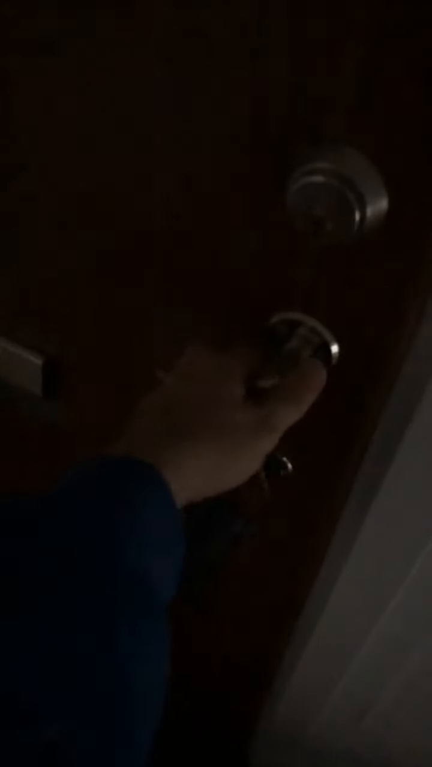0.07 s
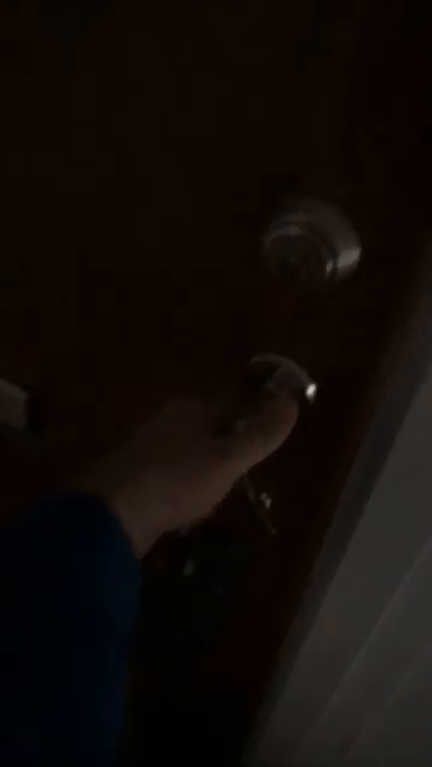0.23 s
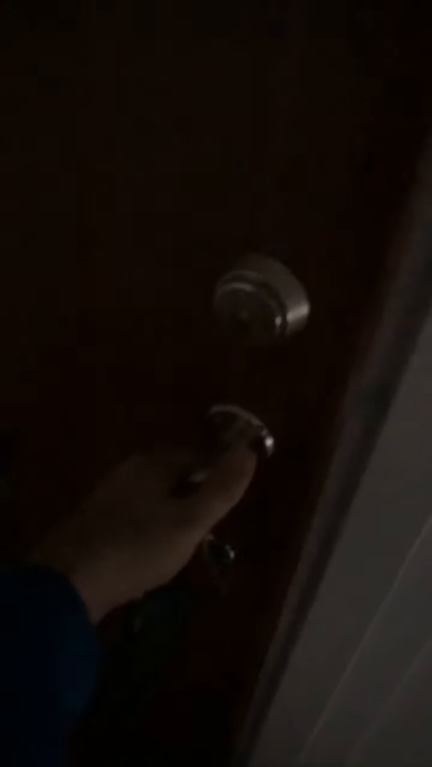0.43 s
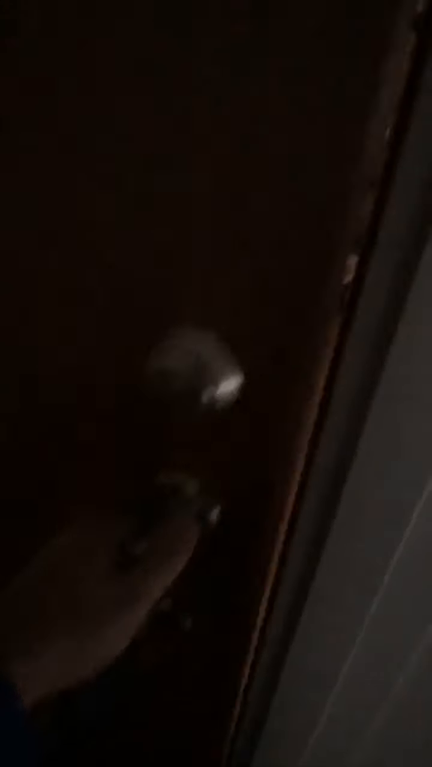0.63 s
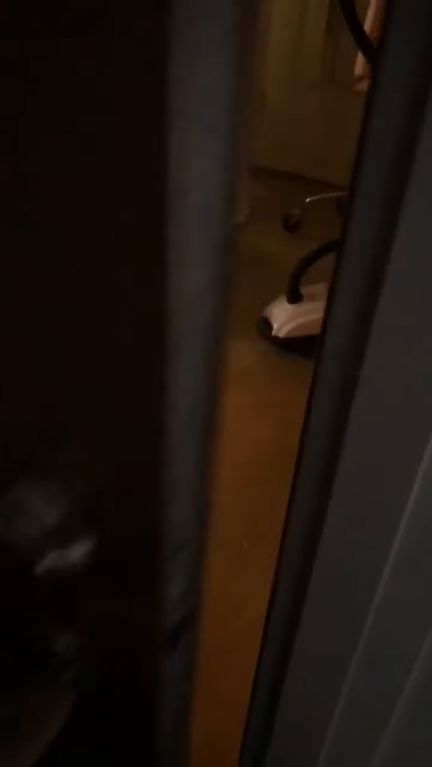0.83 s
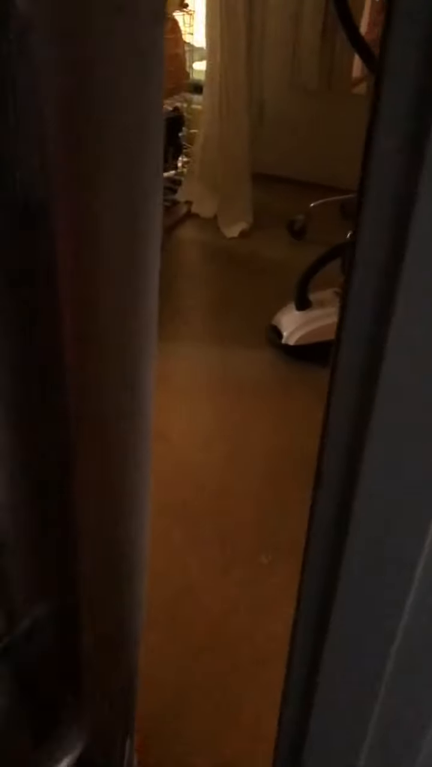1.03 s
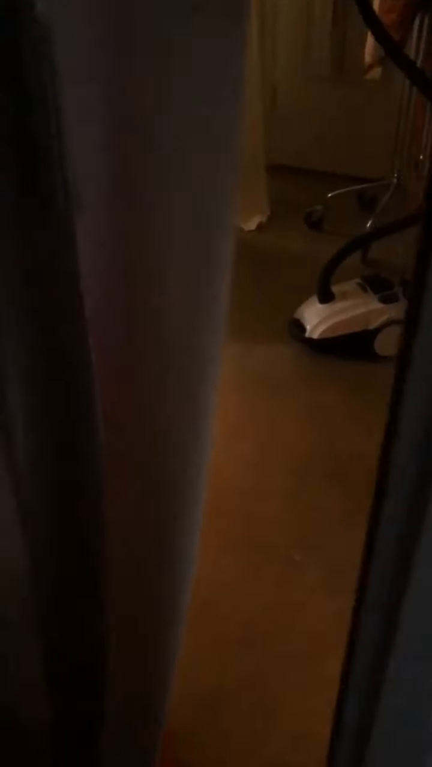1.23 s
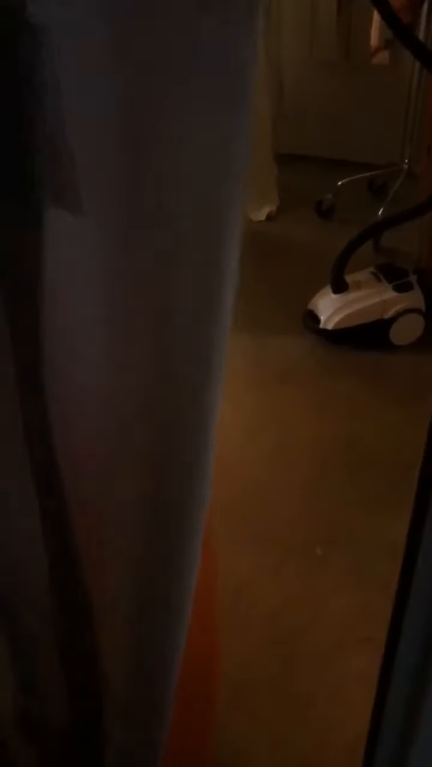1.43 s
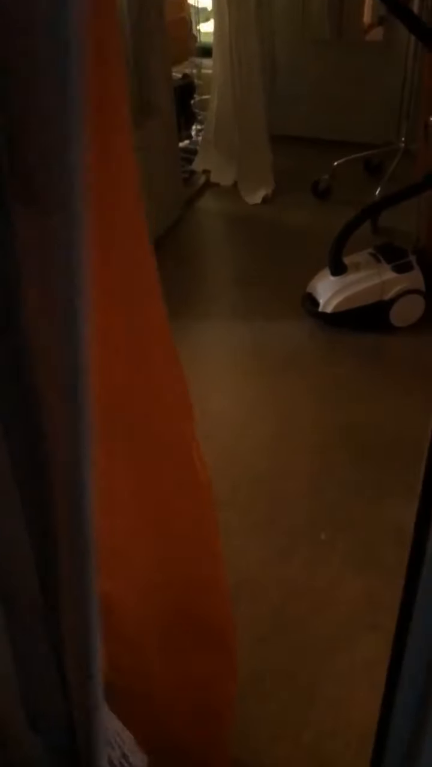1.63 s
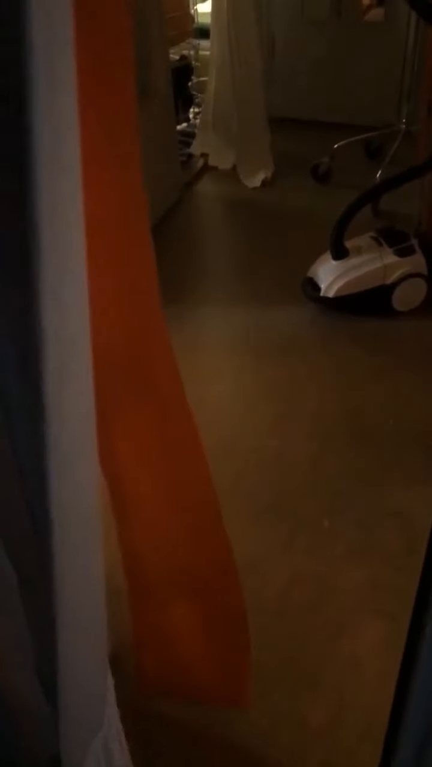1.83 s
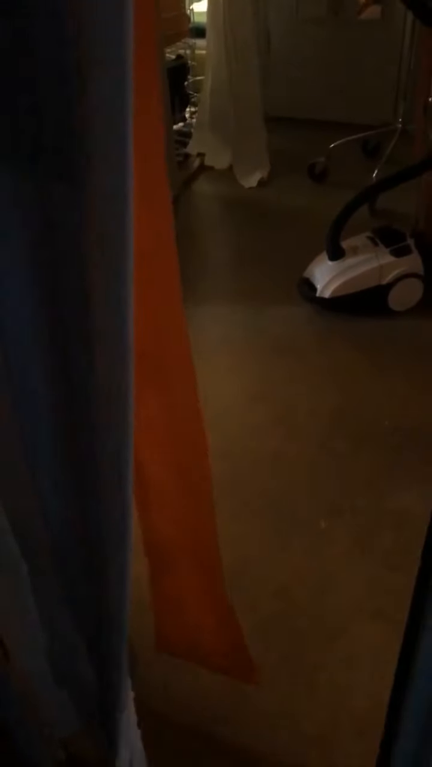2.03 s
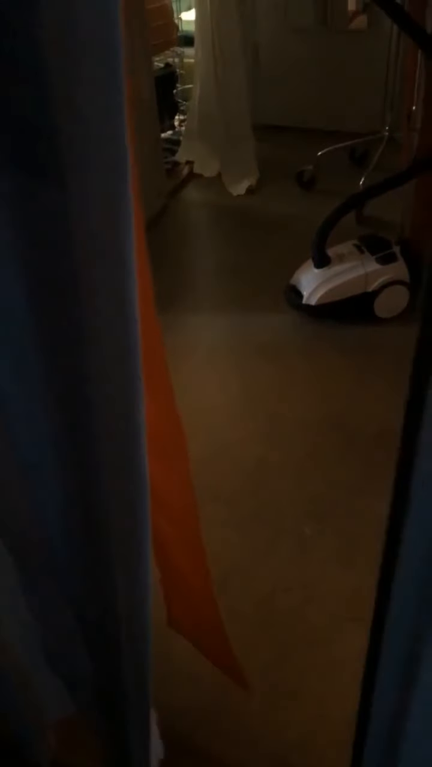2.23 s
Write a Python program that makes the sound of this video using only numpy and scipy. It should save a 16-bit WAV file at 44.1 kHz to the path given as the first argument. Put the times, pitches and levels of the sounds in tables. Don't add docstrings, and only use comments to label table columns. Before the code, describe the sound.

Close handheld pickup of a door latch: one loud snap with a reverberant tail, soft curtain brushing, a smaller knob click, a quiet tap, then faint chinks, rattles and rustle over dull room murmur.

```python
import sys
import numpy as np
from scipy import signal
from scipy.fft import rfft, irfft
from scipy.io import wavfile
from scipy.ndimage import uniform_filter1d

SR = 44100
rng = np.random.default_rng(int(sys.argv[2]) if len(sys.argv) > 2 else 0)


def volts_from_db(level):
    exponent = np.asarray(level, float) / 20
    return 10 ** exponent


def materialize(psi):
    bounded = np.clip(np.atleast_2d(psi).T, -1, 1)
    quanta = np.round(bounded * 32767).astype(np.int16)
    wavfile.write(sys.argv[1], SR, quanta)


N = 101033


def level(x, rms_db):
    return x * volts_from_db(rms_db) / np.sqrt(np.mean(x ** 2))


def colour(x, points):
    p = np.array(points, float)
    hz = np.arange(len(x) // 2 + 1) * SR / len(x) + 1
    gain_db = np.interp(np.log(hz), np.log(p[:, 0]), p[:, 1])
    return irfft(rfft(x) * volts_from_db(gain_db), len(x))


def noise(points):
    return level(colour(rng.standard_normal(N + 1), points)[:N], 0)


def curve(rows):
    return np.interp(np.arange(N) / SR, [r[0] for r in rows], [r[1] for r in rows])


def walk(rate_hz):
    hold = int(SR / rate_hz)
    steps = np.repeat(rng.standard_normal(N // hold + 1), hold)[:N]
    return uniform_filter1d(uniform_filter1d(steps, hold), hold)


def resonate(x, hz, width_hz):
    hz = min(hz, 0.45 * SR)
    return signal.lfilter(*signal.iirpeak(hz, hz / max(width_hz, 20), fs=SR), x)


def resonate_twice(x, hz, width_hz):
    return resonate(resonate(x, hz, width_hz), hz, width_hz)


def hits(rows, body, broad_db, wet_db, low_hz, top_hz, blow_db=-27.0):
    out = np.zeros((2, N + SR))
    t = np.arange(SR // 4) / SR
    band = signal.butter(2, [low_hz, top_hz], "bandpass", fs=SR, output="sos")
    for start_s, level_db, decay_s, pitch in rows:
        push = rng.standard_normal(len(t)) * volts_from_db(-60 * t / decay_s) * np.minimum(t / 0.0015, 1)
        push[8] += volts_from_db(blow_db) * np.sqrt(np.sum(push ** 2))
        crack = signal.sosfilt(band, push)
        ring = volts_from_db(broad_db) * crack
        for hz, width_hz, db in body:
            ring = ring + volts_from_db(db) * resonate_twice(push, hz * pitch, width_hz * pitch * 1.5)
        send = crack + 0.05 * ring
        send = volts_from_db(wet_db) * send * ring.std() / send.std()
        i = int(start_s * SR)
        out[:, i:i + len(t)] += np.array([ring, send]) * volts_from_db(level_db) / np.abs(ring).max()
    return out[:, :N]


# start_s, level_db, decay_s, pitch_factor
SCRAPES = [
    (.051, -20.5, 0.052, 0.93),
    (.062, -18.5, 0.034, 1.4),
    (.069, -25.5, 0.056, 1.05),
    (.086, -17, 0.26, 0.89),
]
# pitch_hz, width_hz, level_db
SCRAPE_BODY = [(1026, 500, -6), (3060, 380, -2), (4490, 500, -3), (6540, 700, -13), (7300, 1300, -8.5),
               (11700, 8000, -21)]


def bolt_scrapes():
    return hits(SCRAPES, SCRAPE_BODY, broad_db=-48, wet_db=1, low_hz=500, top_hz=10500)


# start_s, level_db, decay_s, pitch_factor
SNAPS = [
    (.0896, -5, .018, 1.0),
    (.0935, -11, .05, .97),
    (.098, -13, .08, .93),
]
# pitch_hz, width_hz, level_db
SNAP_BODY = [(286, 180, 13), (590, 480, 8.5), (1020, 270, 11.5), (1570, 440, 3.7), (2230, 1100, 2.5),
             (3520, 1300, 3.7), (4120, 760, 6.4), (5150, 660, 10.6), (11000, 530, 13), (14000, 3900, 6.1)]


def bolt_snaps():
    return hits(SNAPS, SNAP_BODY, broad_db=1, wet_db=0.42, low_hz=150, top_hz=8200, blow_db=-5.0)


# start_s, level_db, decay_s, pitch_factor
RETURNS = [
    (.9078, -21, .009, 1.0),
    (.9092, -15, .019, 1.0),
    (.9125, -22, .05, 1.0),
]
# pitch_hz, width_hz, level_db
RETURN_BODY = [(293, 78, -10), (1260, 180, 3), (1900, 230, 10), (3160, 230, 3), (4180, 980, -2.5),
               (5560, 330, -6), (6730, 310, 4), (8090, 230, 2), (12000, 1200, -9)]


def knob_returns():
    return hits(RETURNS, RETURN_BODY, broad_db=-7.5, wet_db=-2.1, low_hz=580, top_hz=7200, blow_db=-1.0)


# start_s, level_db, decay_s, pitch_factor
SETTLES = [
    (.9415, -37, .03, 1.35),
    (.947, -32, .03, .95),
    (.958, -39, .1, 1.0),
]
# pitch_hz, width_hz, level_db
SETTLE_BODY = [(1350, 110, 3), (1820, 440, 0), (2450, 200, -5), (3580, 240, -8)]


def knob_settles():
    return hits(SETTLES, SETTLE_BODY, broad_db=-30, wet_db=-3.5, low_hz=1320, top_hz=1900, blow_db=-5.0)


# start_s, level_db, decay_s, pitch_factor
TAPS = [
    (1.5038, -21, 0.0085, 0.98),
    (1.5052, -25.5, 0.0034, 0.98),
    (1.5075, -28, 0.29, 1.0),
]
# pitch_hz, width_hz, level_db
TAP_BODY = [(750, 220, -5), (1580, 470, 11), (2350, 1700, 0.5), (3400, 500, 4), (3950, 530, 5),
            (6300, 970, 5), (8750, 400, 1), (9600, 450, -2)]


def latch_taps():
    return hits(TAPS, TAP_BODY, broad_db=-5, wet_db=-0.6, low_hz=600, top_hz=9800, blow_db=-4.0)


# start_s, level_db, tick_db, tilt (steps of 3.9 dB per octave), ring_length_factor
CHINKS = [
    (1.506, -52, -70, 7, .7),
    (1.672, -58, -80, -3, .5),
    (1.870, -35, -46, 1, .9),
    (1.888, -41, -54, .5, 1.0),
    (1.905, -41, -55, 0, 1.2),
    (1.982, -46, -66, 0, .5),
    (2.000, -47, -32, 3, .3),
    (2.008, -46, -42, 0, .3),
    (2.028, -51, -52, 3, .4),
    (2.113, -34, -34, -4, 0.1),
]
# level_db, t60_s; then pitch_hz of each
KEYS = [(-13, .5), (-13, .08), (-14, .45), (-2, .1), (-12, .05), (-8, .06), (-18, .45), (-27, .1)]
KEY_HZ = [6720, 6790, 11740, 11800, 12200, 13600, 13660, 15320]


def keys():
    out = np.zeros(N + SR)
    t = np.arange(SR // 2) / SR
    ends_s = [row[0] for row in CHINKS[1:]] + [N / SR]
    for (start_s, level_db, tick_db, tilt_db, length), end_s in zip(CHINKS, ends_s):
        ring = 0
        for hz, (mode_db, t60_s), phase in zip(KEY_HZ, KEYS, rng.random(len(KEYS))):
            tilted_db = level_db + mode_db + tilt_db * np.log2(hz / 10200.0) * 3.9
            waver_db = 3 * walk(96)[:len(t)]
            decay_db = -60 * t / t60_s / length
            ring = ring + volts_from_db(tilted_db + decay_db + waver_db) * np.sin(2 * np.pi * (hz * t + phase))
        damping = volts_from_db(-900 * np.maximum(t + start_s - end_s, 0))
        tick = volts_from_db(tick_db - 60 * t / 0.034) * resonate(rng.standard_normal(len(t)), 16000, 7800)
        out[int(start_s * SR):][:len(t)] += ring * np.minimum(t / 0.0002, 1) * damping + tick
    return out[:N]


# level_db, t60_s
HOOK = (-48, .28)


def coat_hook():
    out = np.zeros(N + SR)
    t = np.arange(SR // 2) / SR
    level_db, t60_s = HOOK
    start_s, pitch_hz, rise_s = 1.512, 5286, 0.013
    ring = volts_from_db(level_db - 60 * t / t60_s) * np.sin(2 * np.pi * pitch_hz * t)
    out[int(start_s * SR):][:len(t)] += ring * np.minimum(t / rise_s, 1)
    return out[:N]


# start_s, level_db, decay_s, pitch_factor
CLACKS = [
    (1.904, -37, .06, 1.0),
    (1.913, -41, .06, 1.0),
]
# pitch_hz, width_hz, level_db
CLACK_BODY = [(1440, 120, 4), (2200, 100, -1), (2820, 50, 6.5), (3180, 90, 3), (4000, 330, -2),
              (4730, 160, -15)]


def hanger_clacks():
    return hits(CLACKS, CLACK_BODY, broad_db=-12, wet_db=0.46, low_hz=1400, top_hz=6200, blow_db=-3.5)


# start_s, level_db, decay_s, pitch_factor
RATTLES = [
    (2.043, -39, .08, 1.0),
    (2.057, -41, .08, 1.0),
    (2.071, -41, .08, 1.0),
    (2.085, -43, .15, 1.0),
]
# pitch_hz, width_hz, level_db
RATTLE_BODY = [(3410, 420, 1), (4400, 220, 10), (5230, 960, 0.5), (6500, 670, -10)]


def hanger_rattles():
    return hits(RATTLES, RATTLE_BODY, broad_db=-26, wet_db=0.5, low_hz=3400, top_hz=6600, blow_db=-6.0)


# start_s, level_db, decay_s, pitch_factor
KNOCKS = [
    (0.0, -42, 0.062, 0.43),
    (1.354, -35.5, 0.098, 1.0),
    (1.84, -46.5, 0.033, 0.29),
    (2.034, -39, 0.097, 0.7),
    (2.062, -40, .05, 0.99),
    (2.088, -46.5, 0.058, 0.63),
]
# pitch_hz, width_hz, level_db
KNOCK_BODY = [(876, 97, 3), (1150, 120, 2.5), (1900, 250, 3.5), (3700, 900, -5.5)]


def coat_knocks():
    return hits(KNOCKS, KNOCK_BODY, broad_db=-18, wet_db=0.91, low_hz=610, top_hz=2360, blow_db=-2.5)


# start_s, end_s, level_db
BRUSH = (0.69, 1.41, -53)
# pitch_hz, width_hz, level_db
BRUSH_BODY = [(2400, 520, -0.3), (5500, 1500, -0.24)]


def hinge_swish():
    start_s, end_s, level_db = BRUSH
    phase = np.clip((np.arange(N) / SR - start_s) / (end_s - start_s), 0, 1)
    swell = np.sin(np.pi * phase) ** 0.69
    friction = 0
    for hz, width_hz, db in BRUSH_BODY:
        friction = friction + volts_from_db(db) * resonate_twice(rng.standard_normal(N), hz, width_hz)
    return swell * level(friction, level_db)


# start_s, level_db
RUSTLE = [(.3, -63.5), (.45, -49), (.6, -50.5), (.9, -51.5), (1.05, -64), (1.33, -70), (1.4, -58),
          (1.47, -60), (1.5, -64), (1.7, -96), (1.86, -60), (1.99, -63), (2.02, -50), (2.12, -53.5),
          (2.2, -44.5), (2.27, -41)]
# pitch_hz, level_db
CLOTH_BRIGHT = [(1500, -8), (4000, -3.5), (6500, -2.5), (10300, -4), (13500, 0.5), (16000, -4)]


def cloth():
    return volts_from_db(curve(RUSTLE) + 2.8 * walk(39.86)) * noise(CLOTH_BRIGHT)


# start_s, level_db
DRAUGHT = [(0, -19), (.04, -28), (.14, -21.5), (.18, -36), (.32, -36), (.55, -38), (.9, -51.5),
           (1.27, -51.5), (1.33, -46), (1.5, -62), (1.56, -41.5), (1.69, -46), (1.79, -30), (1.9, -33),
           (1.98, -41), (2.08, -59), (2.2, -37), (2.29, -44.5)]
# pitch_hz, level_db
DRAUGHT_COLOUR = [(12, -18), (25, 4), (40, -1.5), (70, -4.5), (100, -21.5), (160, -17), (260, -65),
                  (400, -90)]


def draught():
    gust = noise(DRAUGHT_COLOUR)
    strength = np.sqrt(np.abs(uniform_filter1d(gust ** 2, size=3000)))
    return volts_from_db(curve(DRAUGHT)) * gust / (0.097 + strength)


# start_s (centre), pitch_hz, level_db, length_s
PUFFS = [(0.015, 69.3, -19, 0.031), (0.061, 44.7, -32, 0.023), (0.125, 77.4, -21.5, 0.043),
         (0.197, 61, -33, 0.028), (0.244, 86, -23.5, 0.021), (0.293, 76, -29, 0.026),
         (0.323, 50, -24.5, 0.023), (.408, 65, -25.5, 0.014), (0.539, 44.4, -32, .04)]


def puffs():
    t = np.arange(N) / SR
    out = np.zeros(N)
    for centre_s, pitch_hz, level_db, length_s in PUFFS:
        bell = np.exp(-0.5 * (3.34 * (t - centre_s) / length_s) ** 2)
        out += volts_from_db(level_db) * bell * np.sin(2 * np.pi * pitch_hz * (centre_s - t))
    return out


# pitch_hz, t60_s, level_db
HALL = [(150, 0.48, 7.5), (383, 1.56, -3.5), (1030, 0.93, 1), (1990, 0.74, 1), (4200, 0.99, -3.5),
        (6500, 0.27, -3.5), (11000, 0.31, -1.5), (16000, 0.26, 8)]


def hall(x):
    hall_db, rise_s = -15.5, 0.00057
    t = np.arange(N) / SR
    h = np.array(HALL, float)
    tail = 0
    for hz in 125 * 2 ** np.arange(0, 7.1, 0.5):
        t60_s = np.interp(np.log(hz), np.log(h[:, 0]), h[:, 1])
        db = np.interp(np.log(hz), np.log(h[:, 0]), h[:, 2])
        tail = tail + volts_from_db(db - 60 * t / t60_s) * resonate_twice(rng.standard_normal(N), hz, hz / 2)
    tail = tail * (1 - np.exp(-t / rise_s)) / 10
    return volts_from_db(hall_db) * signal.fftconvolve(x, tail)[:N]


# start_s, level_db
SWISH = [(0, -46.5), (.6, -47.5), (1.0, -52.5), (1.3, -52), (1.48, -57.5), (1.8, -59.5), (2.0, -55.5),
         (2.29, -55.5)]
# pitch_hz, level_db
MURMUR_COLOUR = [(300, -42), (600, -2), (1300, 3), (2400, -1), (4300, -6.5), (5600, -11), (7200, -13.5),
                 (16000, -19.5)]


def murmur():
    return volts_from_db(curve(SWISH) + 0.81 * walk(12.5)) * noise(MURMUR_COLOUR)


# pitch_hz, level_db
AIR = [(53, -47), (90, 2.5), (237, -4), (276, -7.5), (344, -6), (388, -11), (600, -11), (780, -22.5),
       (1320, -120)]


def still_air():
    return level(noise(AIR), -50.5) * volts_from_db(0.69 * (curve(SWISH) + 52.5))


def scene():
    near, send = (bolt_scrapes() + bolt_snaps() + knob_returns() + knob_settles() + latch_taps()
                  + hanger_clacks() + hanger_rattles() + coat_knocks())
    metal = keys() + coat_hook()
    clicks = near + metal + hall(send + volts_from_db(-21) * metal)
    mix = clicks + hinge_swish() + cloth() + draught() + puffs() + murmur() + still_air()
    return mix[None]


def roll_off(x):
    return signal.sosfilt(signal.butter(12, 16500, fs=SR, output="sos"), x)


def record(dry):
    low_pass = signal.ellip(12, 0.2, 55, 15750, fs=SR, output="sos")
    mix = signal.sosfilt(low_pass, dry)
    return roll_off(mix)


dry = scene()
out = record(dry)
materialize(out)
```